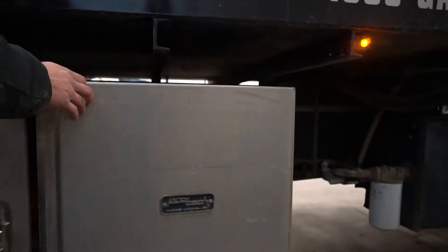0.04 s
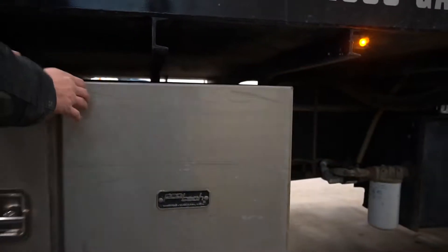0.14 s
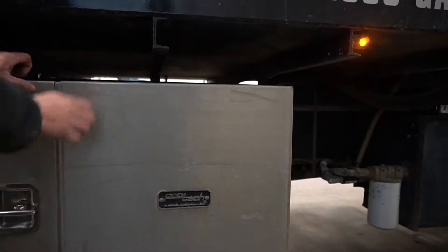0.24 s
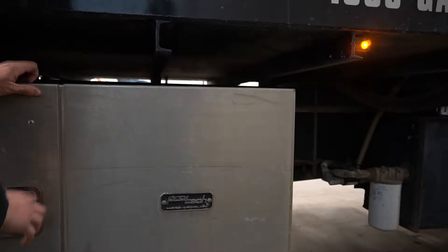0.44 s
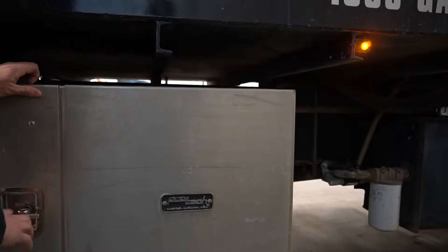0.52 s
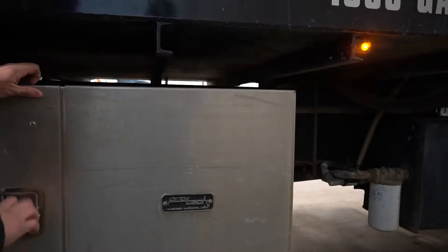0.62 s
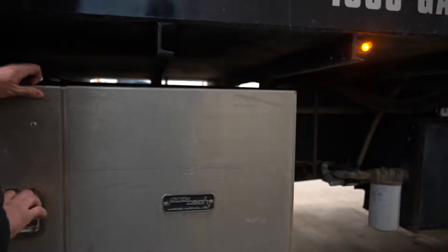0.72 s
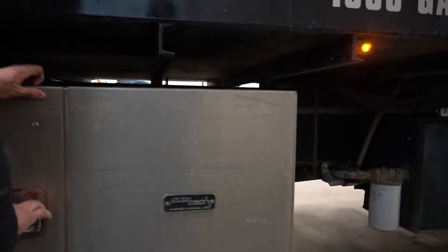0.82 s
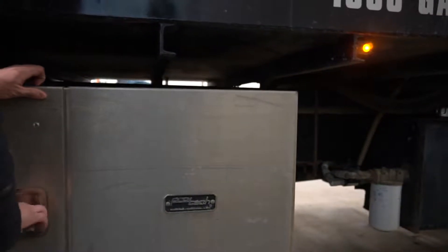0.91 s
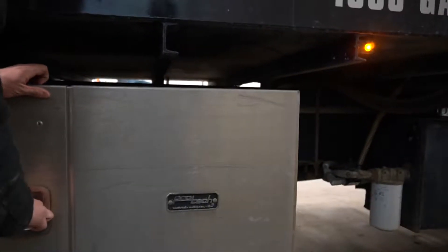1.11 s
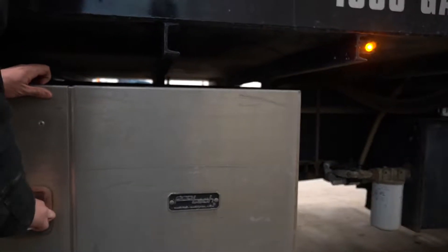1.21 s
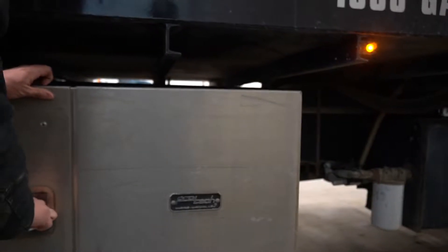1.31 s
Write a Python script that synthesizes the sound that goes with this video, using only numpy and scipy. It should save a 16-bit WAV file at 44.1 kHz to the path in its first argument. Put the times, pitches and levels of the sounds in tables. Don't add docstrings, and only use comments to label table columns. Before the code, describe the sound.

Metal locker door scrapes, ticks and bangs closed, ringing briefly before soft latch handle taps

```python
import sys
import numpy as np
from scipy import signal
from scipy.fft import rfft, irfft, next_fast_len
from scipy.io import wavfile
from scipy.ndimage import uniform_filter1d

SR = 44100
rng = np.random.default_rng(int(sys.argv[2]) if len(sys.argv) > 2 else 0)


def linear_from_db(decibels):
    return 10 ** (np.asarray(decibels, float) / 20)


def master_out(mix):
    frames = np.transpose(np.atleast_2d(mix))
    ceiling = np.clip(frames, -1, 1)
    pcm = np.round(ceiling * 32767).astype(np.int16)
    wavfile.write(sys.argv[1], SR, pcm)


N = 59535

# time_s, level_db
SLIDE = [(0, -32), (.012, -37), (.058, -40.5), (.066, -34.5), (.09, -31.5), (.114, -36), (.14, -32),
         (.2, -35.5), (.238, -37.5)]
# frequency_hz, density_db
SLIDE_TONE = [(150, -50.5), (350, -16.5), (650, -11), (1340, -9.5), (2200, -13), (4000, -10.5), (8000, -12),
              (16000, -11.5)]
SLIDE_PER_S, SLIDE_WET_DB = 4300, -5

# start_s, peak_db, pitch_hz, decay_t60_s, left_over_right_db
TICKS = [(0.0153, -19, 6580, 0.061, 11.5), (0.0648, -18.5, 6170, 0.046, 12.5),
         (0.0867, -25, 8900, 0.046, 22), (0.1395, -21, 13800, 0.12, 13), (0.195, -28, 11200, 0.055, 13),
         (0.2431, -8.5, 5460, 0.13, 4.5), (0.2681, -16.5, 6400, 0.1, -14.5),
         (0.2716, -11, 4980, 0.16, 14.5), (0.3286, -11.5, 4300, 0.035, -4),
         (0.3804, -11.5, 11200, 0.021, -2.5), (0.3825, -12, 7900, .03, 0), (0.3826, -11, 4670, 0.077, 5),
         (1.05, -39.5, 5100, 0.077, 9), (1.106, -46, 6000, 0.082, 10), (1.1957, -27, 10600, 0.023, 10),
         (1.197, -40, 8360, .025, 8), (1.1985, -40, 4490, 0.058, 6)]
# frequency_hz, density_db
TICK_TONE = [(880, -42), (2500, -13), (4000, -1.5), (8740, -4), (12000, -4.5), (14600, -9), (16000, -19.5)]
TICK_FOCUS_DB, TICK_PING_DB, TICK_WET_DB = 5.5, -17.5, 0.5
CRACK_DB, CRACK_T60_S = 1, 0.016

# frequency_hz, level_db, decay_t60_s
BOOM_MODES = [(151, -34.5, 0.047), (95, -41, .08), (299, -38, 0.08), (97, -45, 0.64), (156.7, -49.5, 1),
              (210, -39, 0.14)]
BOOM_TIMES = [.217, .243, .26, .405, .37, .42]
BOOM_SWELL_S, BOOM_WET_DB = 0.029, -6.0

# start_s, peak_db
BUMPS = [
    (0.2177, -15),
    (0.23, -22),
    (0.2318, -24.5),
]
# frequency_hz, density_db
BUMP_TONE = [(60, -22), (130, -1.5), (330, -10.5), (560, -3.5), (800, -6.5), (1500, -8), (3300, -16),
             (7000, -41)]
BUMP_T60_S, BUMP_WET_DB = 0.019, 3.5
BUMP_PING_HZ, BUMP_PING_DB, BUMP_PING_T60_S = 1906, -18, 0.02

# time_s, level_db
SHUDDER = [(.2415, -62), (.2428, -11.5), (.262, -17.5), (.27, -34), (.274, -16), (.335, -11.5),
           (.378, -18.5), (.39, -16), (.5, -36)]
# start_s, level_db
BLOWS = [
    (0.2422, 7.5),
    (0.2724, 8),
    (0.3822, 4),
]
# frequency_hz, density_db
DOOR_TONE = [(24, -71), (60, -35.5), (330, -11), (663, -1.5), (1070, -4.5), (1410, -1), (2260, -4.5),
             (4240, -1), (16000, -30.5)]
# frequency_hz, decay_t60_s
DOOR_T60 = [(100, 0.36), (700, 0.12), (4000, 0.073), (14000, 0.062)]
# frequency_hz, level_db, decay_t60_s
DOOR_MODES = [(310.6, -5, 0.12), (572.6, -2, 0.13), (646, -3, 0.15), (754, -11.5, 0.11), (927, -9, 0.13),
              (968, -16, 0.115), (1356, -22, 0.16), (1765, -5, 0.21), (1980, -6, 0.12), (2400, -12.5, 0.13),
              (3290, -14.5, 0.1), (3880, -12, 0.07), (4300, -7, 0.11), (4630, -13, 0.16)]
SHUDDER_PER_S, SHUDDER_WET_DB, DOOR_MODES_DB, DOOR_LIKENESS = 3600, -8.5, -13, 0.11
SOFTEN_HZ, SOFTEN_S = 5960, 0.11

# start_s, peak_db, pitch_hz
CLANKS = [(0.2432, -14, 1137), (.2672, -20.5, 890), (0.2734, -7.5, 1840), (0.2787, -10, 2050),
          (.2885, -14.5, 1680), (.2935, -13, 650), (0.2992, -14, 1700), (.3055, -14.5, 610),
          (0.3099, -16, 1800), (.3195, -13, 610), (.33, -14.5, 890), (.335, -23, 1480), (.343, -16, 1580),
          (.3545, -13.5, 676), (0.3592, -12, 1110), (0.3739, -13, 1520), (.391, -17, 770), (.407, -16, 700),
          (.411, -8.5, 4500), (.4185, -16.5, 844), (.432, -21, 901.4)]
CLANK_CYCLES, CLANK_PARTNER_RATIO, CLANK_SPREAD = 12.2, 1.42, 0.2

# time_s, level_db
BRUSH = [(.99, -110), (1.02, -63), (1.045, -57), (1.09, -54), (1.115, -50), (1.135, -55), (1.19, -49),
         (1.2, -40), (1.27, -54)]
# frequency_hz, density_db
BRUSH_TONE = [(300, -13), (2500, -5.5), (4800, -1), (7000, -12), (16000, -17)]

# start_s, peak_db, brightness_hz
KNOCKS = [(1.0504, -27.5, 4700), (1.0535, -32, 1480), (1.0565, -34.5, 4000), (1.062, -28.5, 3330),
          (1.0651, -25.5, 2150), (1.0735, -35, 2400), (1.0875, -25, 1230), (1.094, -36, 1500),
          (1.1, -37, 2520), (1.1055, -25, 940), (1.121, -26.5, 1790), (1.135, -26.5, 1025),
          (1.146, -37, 1000)]
# frequency_hz, level_db, decay_t60_s
HANDLE_MODES = [(145, -31, 0.08), (438, -19, 0.052), (557, -18, 0.053), (630, -10, 0.11),
                (700, -14.5, 0.034), (920, -15.5, 0.054), (1194, -14, 0.059), (1536, -13.5, 0.034),
                (1837, -9, 0.045), (2414, -8, 0.08), (3730, -11, .03)]
# frequency_hz, density_db
HANDLE_TONE = [(80, -28), (150, -18), (350, 4), (630, 10), (1000, 1), (2300, 4.5), (4200, -2.5),
               (7000, -30)]
# time_s, gain_db
PALM = [(1.0, 0), (1.109, 0), (1.112, -7), (1.137, -8), (1.141, -13), (1.35, -20)]
KNOCK_T60_S, KNOCK_NOISE_DB, KNOCK_WET_DB = 0.06, 3, -10

# time_s, level_db
SQUEAK = [(1.138, -70), (1.152, -53), (1.17, -48), (1.195, -47), (1.199, -62), (1.235, -68), (1.25, -63),
          (1.3, -68)]
# time_s, level_db
SQUEAK_OCTAVE = [(1.12, -72), (1.133, -55), (1.158, -56), (1.17, -61), (1.195, -60), (1.25, -61),
                 (1.32, -68)]
SQUEAK_HZ, SQUEAK_OCTAVE_HZ = 1357, 2772
SQUEAK_WOBBLE_DB, SQUEAK_WET_DB = 2.5, -7

# frequency_hz, decay_t60_s
SHED_T60 = [(60, 0.91), (250, 0.61), (600, 0.67), (1400, 0.99), (2500, 1.31), (4000, 1.03), (7000, 0.66),
            (14000, 0.24)]
# frequency_hz, density_db
SHED_TONE = [(60, -6), (300, -1), (1000, -1.5), (3000, 0.5), (6000, -2.5), (15000, -10)]
SHED_RISE_S = 0.02
SHIELD_S, SHIELD_DB = 1, -7
# frequency_hz, correlation
LIKENESS = [(100, 1), (300, 0.98), (600, 0.95), (1200, 0.69), (2500, 0.48), (6000, 0.033)]
# frequency_hz, density_db
AIR_TONE = [(30, -13), (157, -0.5), (384, -1.5), (721, 7.5), (2480, 3.5), (4500, -3), (7000, -17),
            (16000, -17)]
AIR_DB, LEFT_DB = -53.5, 0.23
LOW_CUT_HZ, MIC_TOP_HZ, CLIP = 98, 16900, 1


def rms_one(x):
    return x / np.sqrt(np.mean(x ** 2) + 1e-20)


def at_hz(points, hz):
    table = np.array(points)
    return np.interp(np.log(hz), np.log(table[:, 0]), table[:, 1])


def gain_curve(rows):
    s, db = np.transpose(rows)
    return linear_from_db(np.interp(np.arange(N) / SR, s, db, left=-150, right=-150))


def dying_noise(tone, t60s, near=0., size=16384):
    hz = np.maximum(np.arange(size // 2 + 1) * SR / size, 1)
    t = np.arange(size) / SR
    coloured = rfft(rng.standard_normal((2, size))) * linear_from_db(at_hz(tone, hz))
    out = 0
    for k in range(28):
        centre = 31.25 * 2 ** (k / 3)
        offset = np.clip(3 * np.log2(hz / centre), -1, 1)
        mid, side = irfft(coloured * np.cos(np.pi / 2 * offset) ** 2, size)
        alike = np.clip(1 - (1 - at_hz(LIKENESS, centre)) * (1 - near), 0, 1)
        shape = linear_from_db(-60 * t / at_hz(t60s, centre)) * (1 - np.exp(-2 * t * centre))
        out = out + shape * (np.sqrt(1 + alike) * mid + np.sqrt(1 - alike) * side * [[1], [-1]])
    return out / np.sqrt(np.sum(out ** 2) / 2)


def through(x, response):
    size = next_fast_len(2 * N)
    return irfft(rfft(x, size) * rfft(response, size), size)[..., :N]


def ring(force, hz, t60):
    r = linear_from_db(-60 / (t60 * SR))
    w = 2 * np.pi * hz / SR
    return signal.lfilter([0, np.sin(w)], [1, -2 * r * np.cos(w), r * r], force + 1e-18)


def clicks_at(s, gain):
    out = np.zeros(N)
    out[(np.atleast_1d(s) * SR).astype(int)] = gain
    return out


def grains(per_s, spread_db):
    sizes = linear_from_db(spread_db * np.minimum(rng.exponential(1, N), 4))
    sizes = sizes * rng.choice([-1, 1], N)
    return rms_one(sizes * (rng.random(N) < per_s / SR))


def scattered(push, tone, t60s, near, count=6):
    place = rng.integers(0, count, N)
    return sum(through(push * (place == k), dying_noise(tone, t60s, near)) for k in range(count))


def slide():
    push = grains(SLIDE_PER_S, spread_db=2.5) * gain_curve(SLIDE)
    return scattered(push, SLIDE_TONE, [(300, 0.03), (9000, 0.016)], near=0.046)


def ticks():
    out = np.zeros((2, N))
    crack = 1 + linear_from_db(CRACK_DB - 60 * np.arange(8192) / SR / CRACK_T60_S)
    hz_grid = np.geomspace(800, 17000, num=30)
    for s, db, hz, t60, pan_db in TICKS:
        focus_db = TICK_FOCUS_DB * np.exp(-8 * np.log(hz_grid / hz) ** 2)
        tone = np.column_stack([hz_grid, at_hz(TICK_TONE, hz_grid) + focus_db])
        burst = crack * dying_noise(tone, [(3000, t60), (14000, 1.96 * t60)], near=0.12, size=8192)
        click = clicks_at(s, linear_from_db(db))
        ping = ring(click, hz, 0.3 * t60) + ring(click, 0.74 * hz, 0.32 * t60)
        tick = through(click, burst / np.abs(burst).max()) + linear_from_db(TICK_PING_DB) * ping
        out += tick * linear_from_db([[pan_db / 2], [-pan_db / 2]])
    return out


def booms():
    out = 0
    for s, (hz, db, t60) in zip(BOOM_TIMES, BOOM_MODES):
        click = clicks_at(s, linear_from_db(db) * 14 / SR / BOOM_SWELL_S)
        swell = ring(click, hz, BOOM_SWELL_S)
        out = out + ring(swell, hz, t60)
    return out * np.ones((2, 1))


def bumps():
    out = ring(clicks_at(BUMPS[0][0], linear_from_db(BUMP_PING_DB)), BUMP_PING_HZ, BUMP_PING_T60_S)
    decay = [(150, 2 * BUMP_T60_S), (2500, 0.83 * BUMP_T60_S)]
    for s, db in BUMPS:
        body = dying_noise(BUMP_TONE, decay, near=0.82, size=4096)
        out = out + through(clicks_at(s, linear_from_db(db)), body / np.abs(body).max())
    return out


def door():
    hard = grains(SHUDDER_PER_S, spread_db=5.0) * gain_curve(SHUDDER)
    soft = signal.sosfilt(signal.butter(2, SOFTEN_HZ, fs=SR, output="sos"), hard)
    hard_share = np.exp(-np.maximum(np.arange(N) / SR - BLOWS[0][0], 0) / SOFTEN_S)
    blows = sum(clicks_at(s, linear_from_db(db)) for s, db in BLOWS)
    push = hard_share * hard + (1 - hard_share) * soft + blows
    modes = 0
    for hz, db, t60 in DOOR_MODES:
        mode = ring(clicks_at(0, 0.56), hz, t60) / np.sqrt(t60 * SR / 28)
        modes = modes + linear_from_db(db) * rng.choice([-1, 1]) * mode
    dense = scattered(push, DOOR_TONE, DOOR_T60, near=DOOR_LIKENESS, count=8)
    return dense + linear_from_db(DOOR_MODES_DB) * through(push, modes)


def clanks():
    out = 0
    for k, (s, db, hz) in enumerate(CLANKS):
        click = clicks_at(s, linear_from_db(db))
        side = CLANK_SPREAD * (-1) ** k * np.array([[1], [-1]])
        t60 = CLANK_CYCLES / hz
        partner = ring(click, CLANK_PARTNER_RATIO * hz, t60)
        out = out + ring(click, hz, t60) - 0.42 * (1 + side) * partner
    return out


def brush():
    push = grains(6700, spread_db=-3.5) * gain_curve(BRUSH)
    return scattered(push, BRUSH_TONE, [(300, 0.052), (9000, 0.01)], near=0.086, count=3)


def handle():
    out = 0
    decay = [(200, KNOCK_T60_S), (4000, 2.6 * KNOCK_T60_S)]
    for s, db, cut_hz in KNOCKS:
        body = dying_noise(HANDLE_TONE, decay, near=0.1, size=8192)
        push = signal.sosfilt(signal.butter(2, cut_hz, fs=SR, output="sos"), clicks_at(s, linear_from_db(db)))
        modes = sum(linear_from_db(level_db + rng.normal(0, 3.3)) * ring(push, hz, t60)
                    for hz, level_db, t60 in HANDLE_MODES)
        out = out + modes + linear_from_db(KNOCK_NOISE_DB) * through(push, body / np.abs(body).max())
    return out * gain_curve(PALM)


def squeak():
    t = np.arange(N) / SR
    drift = rms_one(uniform_filter1d(rng.standard_normal((2, N)), size=200))
    wobble = linear_from_db(SQUEAK_WOBBLE_DB * drift)
    low = gain_curve(SQUEAK) * wobble[0] * np.sin(2 * np.pi * SQUEAK_HZ * t)
    high = gain_curve(SQUEAK_OCTAVE) * wobble[1] * np.sin(2 * np.pi * SQUEAK_OCTAVE_HZ * t)
    return np.sqrt(2) * (low + high) * np.ones((2, 1))


def scene():
    layers = [(slide() + brush(), SLIDE_WET_DB), (ticks(), TICK_WET_DB), (booms(), BOOM_WET_DB),
              (bumps(), BUMP_WET_DB), (door() + clanks(), SHUDDER_WET_DB),
              (handle(), KNOCK_WET_DB), (squeak(), SQUEAK_WET_DB)]
    shed = dying_noise(SHED_TONE, SHED_T60, size=N)
    shed = shed * (1 - np.exp(-np.arange(N) / SR / SHED_RISE_S))
    shield = np.where(np.arange(N) > SHIELD_S * SR, linear_from_db(SHIELD_DB), 1)
    send = sum(linear_from_db(wet_db) * x.mean(axis=0) for x, wet_db in layers)
    wet = through(shield * send, shed)
    steady = [(100, 1e3), (9000, 1e3)]
    air = linear_from_db(AIR_DB) * rms_one(dying_noise(AIR_TONE, steady, size=N))
    direct = sum(x for x, wet_db in layers)
    return (direct + wet + air) * linear_from_db([[LEFT_DB / 2], [-LEFT_DB / 2]])


def band_limit(x):
    return signal.sosfilt(signal.butter(12, 16470, fs=SR, output="sos"), x)


def record(dry):
    x = signal.sosfilt(signal.butter(2, LOW_CUT_HZ, "high", fs=SR, output="sos"), dry)
    x = CLIP * np.tanh(x / CLIP)
    x = signal.sosfilt(signal.cheby2(10, 50, MIC_TOP_HZ, fs=SR, output="sos"), x)
    return band_limit(x)


dry = scene()
out = record(dry)
master_out(out)
```